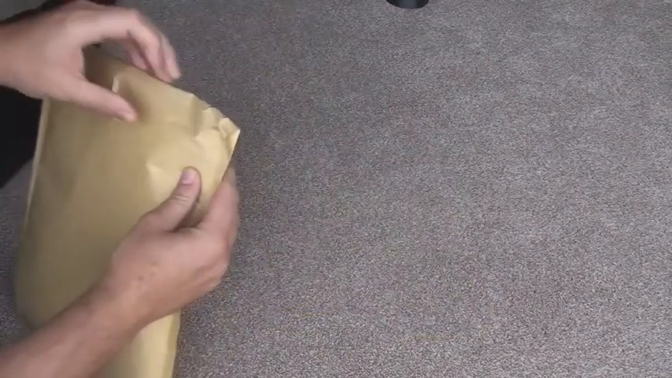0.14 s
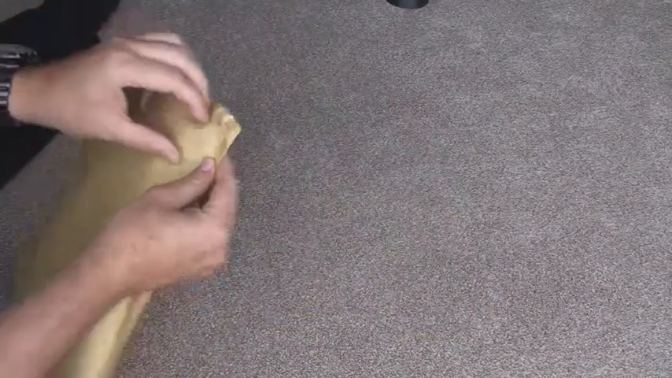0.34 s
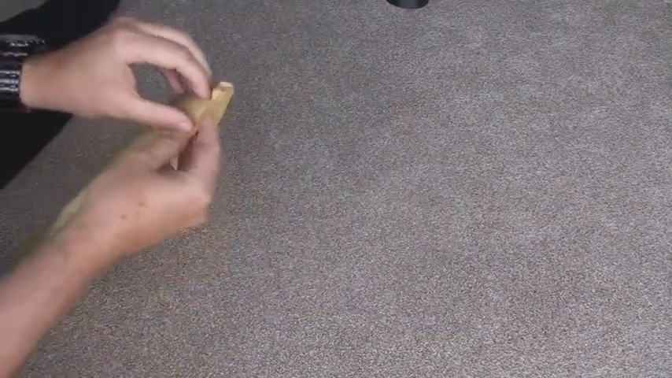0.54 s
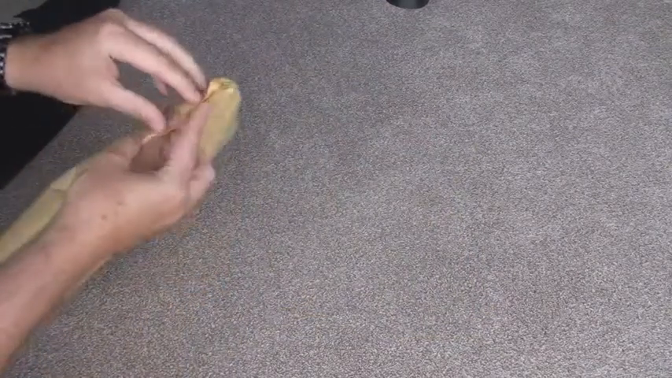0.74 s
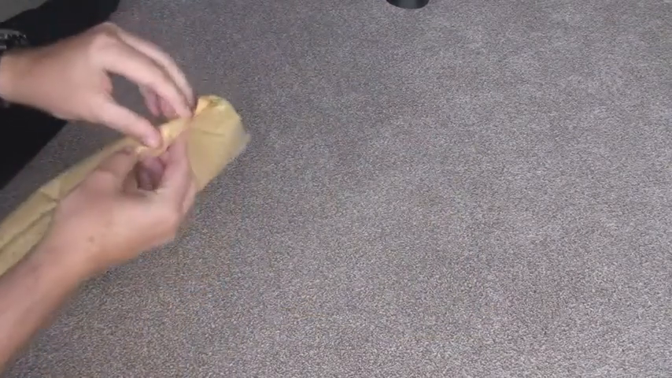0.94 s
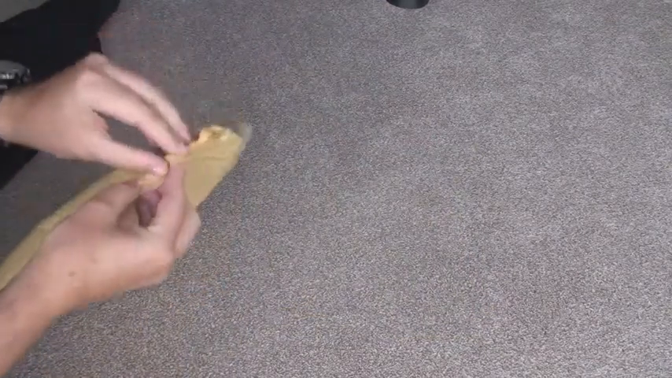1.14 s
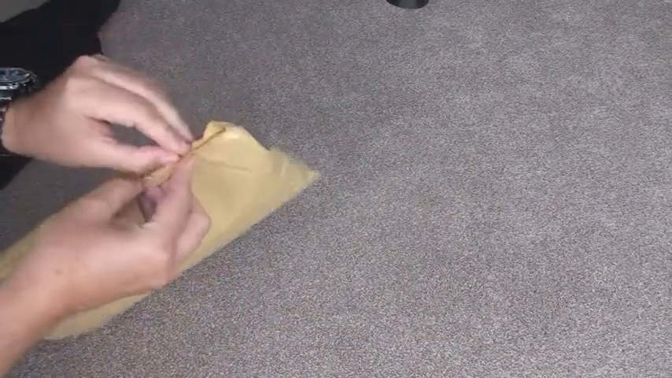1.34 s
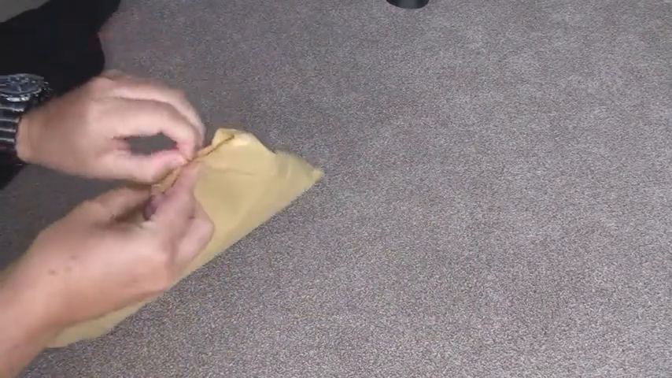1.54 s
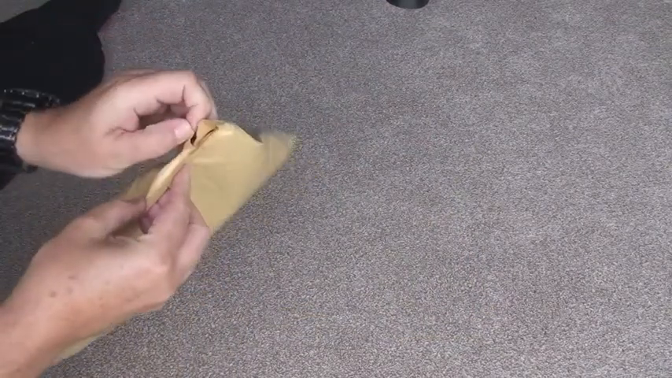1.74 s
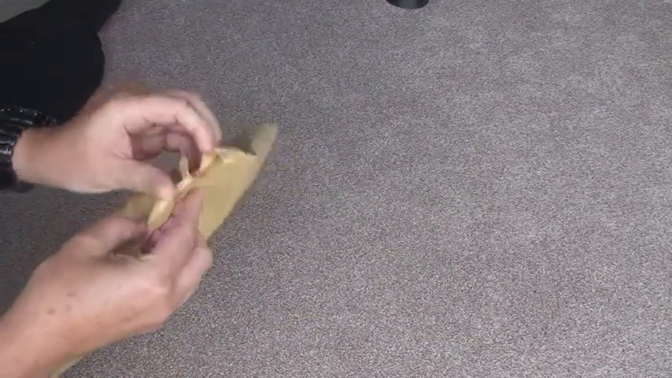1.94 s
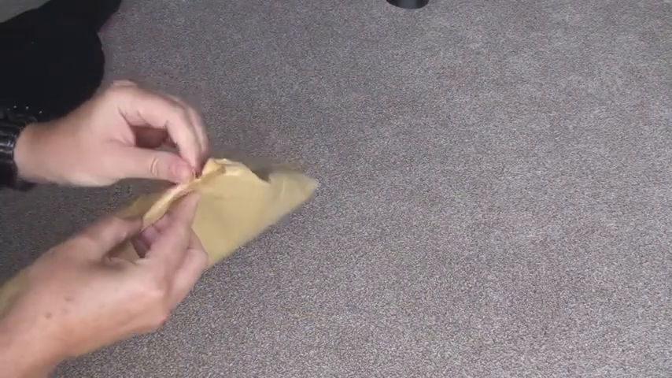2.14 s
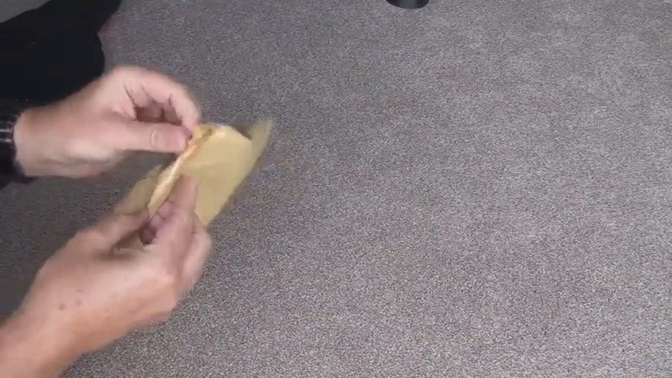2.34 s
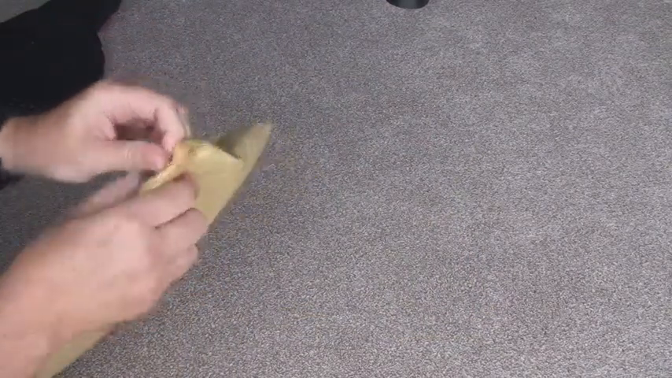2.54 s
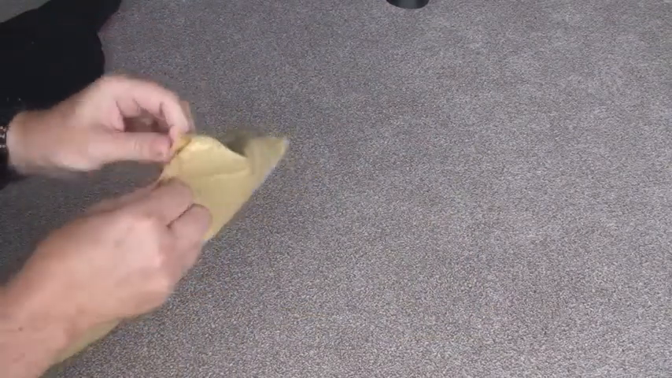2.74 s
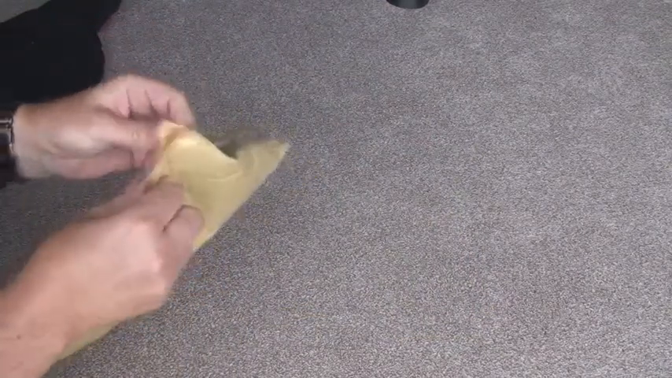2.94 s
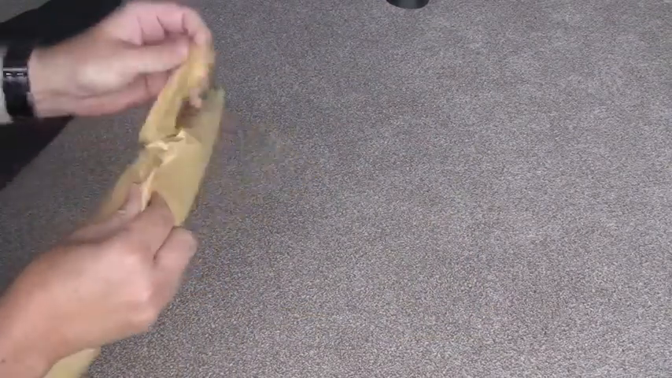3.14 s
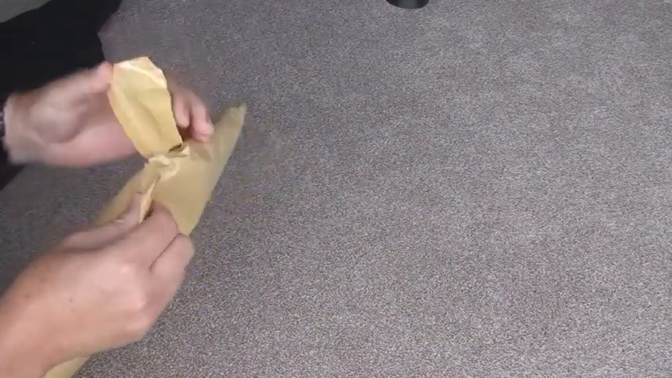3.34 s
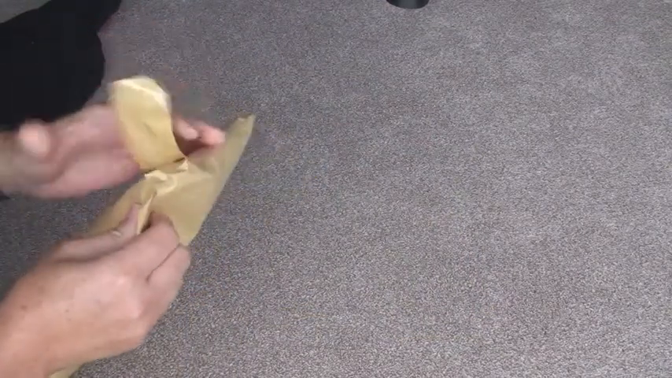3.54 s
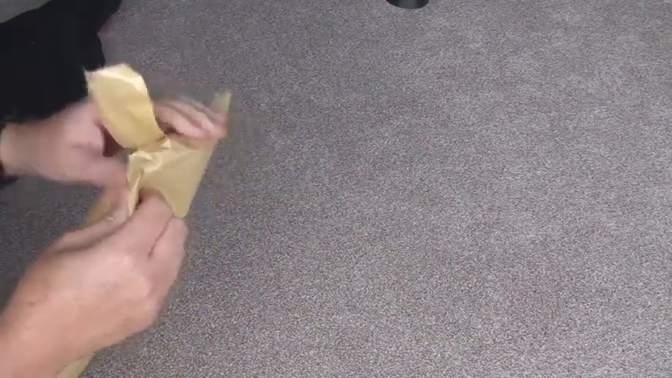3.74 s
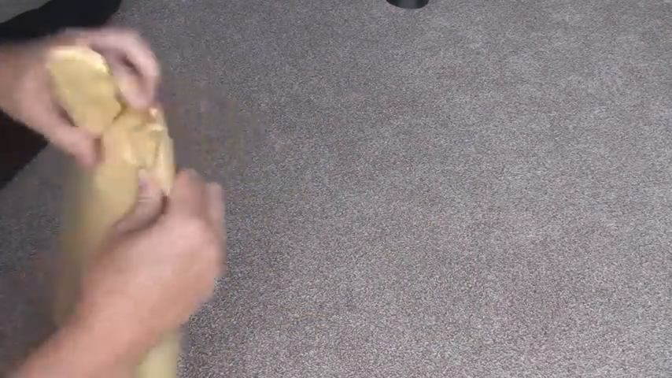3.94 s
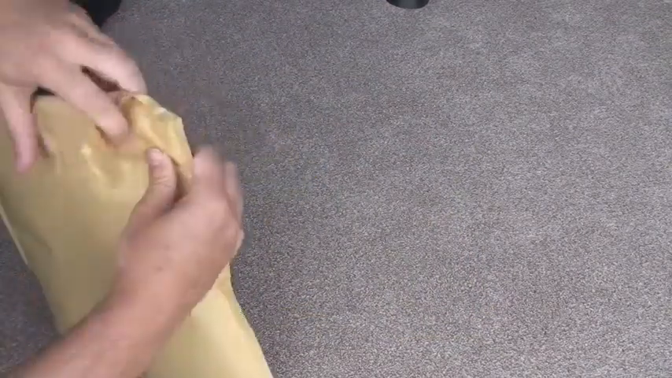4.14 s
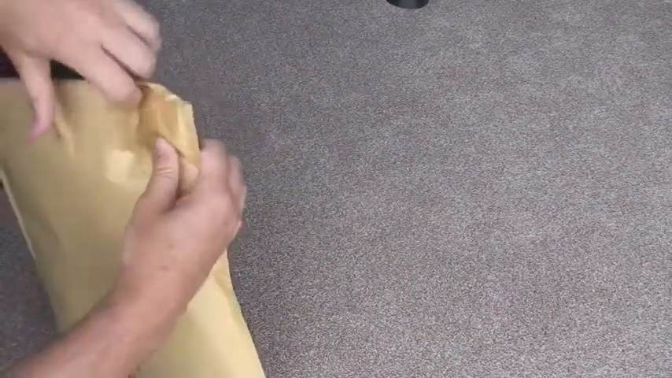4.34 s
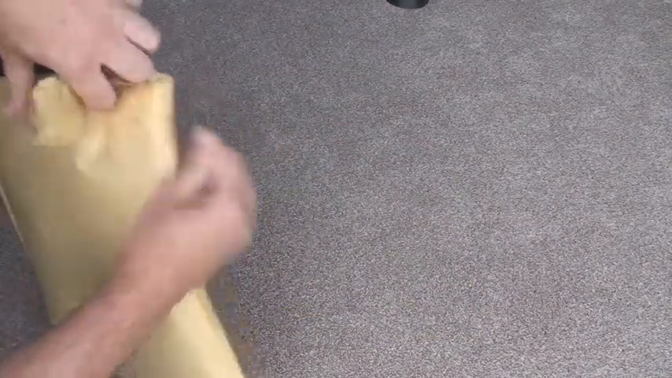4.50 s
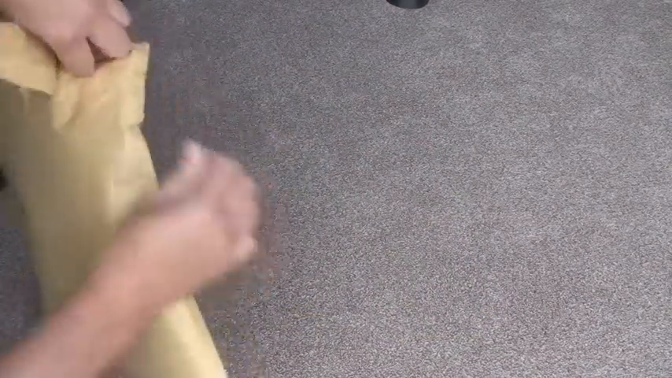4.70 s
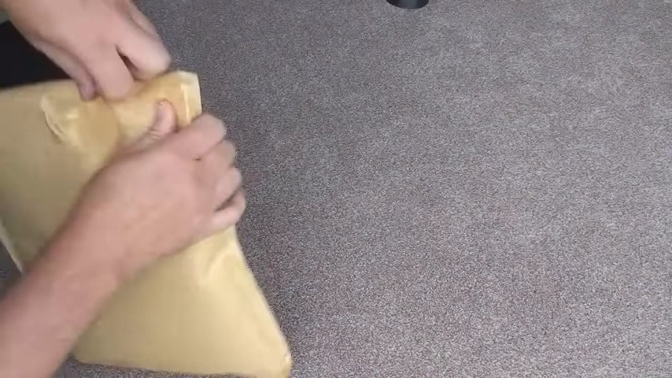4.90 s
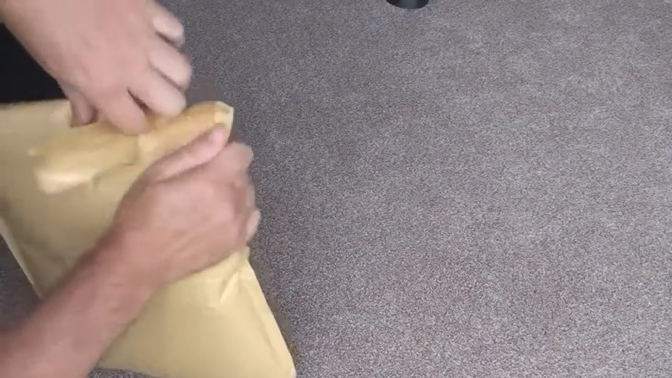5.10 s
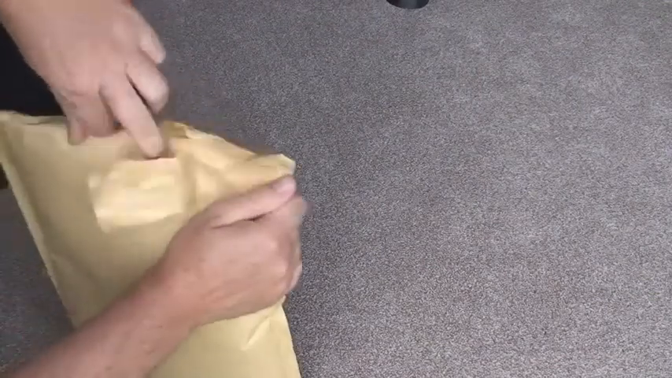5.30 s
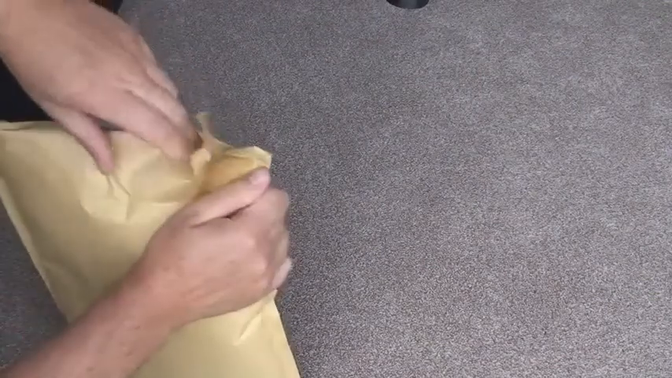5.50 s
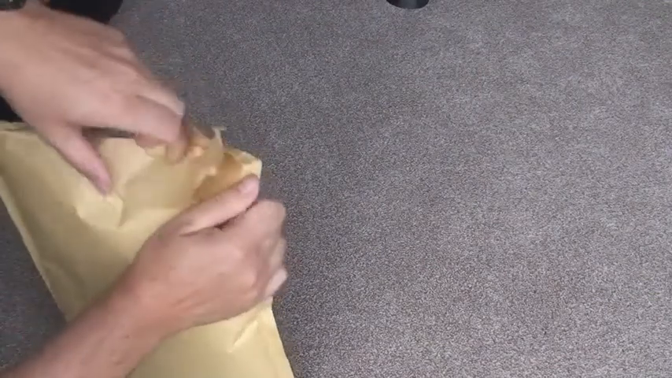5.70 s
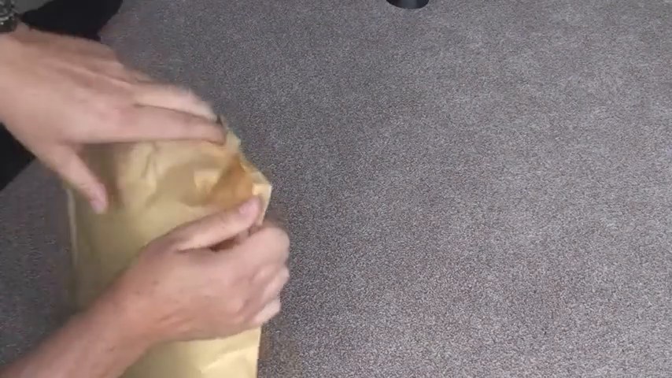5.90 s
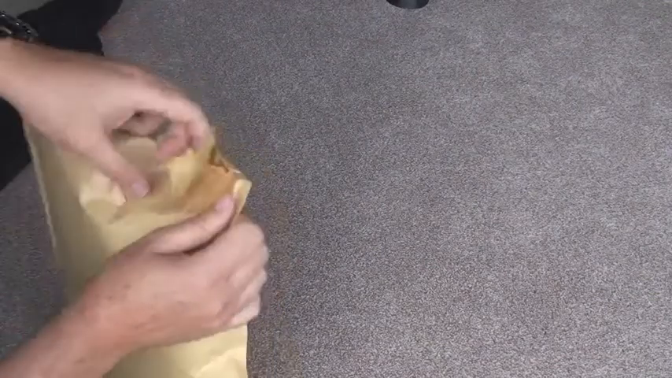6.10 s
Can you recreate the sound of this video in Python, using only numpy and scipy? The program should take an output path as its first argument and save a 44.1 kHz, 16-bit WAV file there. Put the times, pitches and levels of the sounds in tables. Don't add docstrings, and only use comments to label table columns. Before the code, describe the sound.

Close, dry crackling of a stiff paper mailer being squeezed, picked at and ripped in bursts, over a very faint low room hum.

```python
import sys
import numpy as np
from scipy import signal
from scipy.fft import rfft, irfft, next_fast_len
from scipy.io import wavfile
from scipy.ndimage import uniform_filter1d

SR = 44100
rng = np.random.default_rng(int(sys.argv[2]) if len(sys.argv) > 2 else 0)


def to_linear_factor(level_db):
    exponent = np.asarray(level_db, float) / 20
    return 10 ** exponent


def materialize(psi):
    bounded = np.clip(np.atleast_2d(psi).T, -1, 1)
    quanta = np.round(bounded * 32767).astype(np.int16)
    wavfile.write(sys.argv[1], SR, quanta)


N = 276227


def unit(x):
    return x / np.sqrt(np.mean(x ** 2, axis=-1, keepdims=True) + 1e-20)


def along(points, hz):
    f, v = np.transpose(points)
    return np.interp(np.log(hz + 1), np.log(f + 1), v)


def filtered(x, response):
    m = next_fast_len(x.shape[-1] + 8192)
    spectrum = rfft(x, m) * response(np.fft.rfftfreq(m, 1 / SR))
    return irfft(spectrum, m)[..., :x.shape[-1]]


def resonances(modes):
    def response(f):
        return sum((-1) ** k * to_linear_factor(db) * 1j * f * w / (c * c - f * f + 1j * f * w)
                   for k, (c, w, db) in enumerate(modes))
    return response


def level_of(rows):
    s, *columns = np.transpose(rows)
    t = np.arange(N) / SR
    return to_linear_factor([np.interp(t, s, db, -120, -120) for db in columns])


def place(times_s, rows):
    starts = np.round(np.asarray(times_s) * SR).astype(int)
    at = starts[:, None] + np.arange(rows.shape[1])
    return np.bincount(at.ravel(), rows.ravel(), N + SR)[:N]


def around(times_s, dbs, width_s):
    half = SR // 10
    t = np.arange(-half, half) / SR
    swells = to_linear_factor(dbs)[:, None] * np.exp(-(t / width_s) ** 2)
    return np.pad(place(times_s, swells)[half:], (0, half))


def ticks(count, spread_db, life_s):
    when, size = rng.random((count, 2)).T
    t = np.arange(int(min(life_s, .05) * SR)) / SR
    energy = to_linear_factor(-spread_db * np.log(size + .04))[:, None] ** 2
    return place(when * N / SR, energy * to_linear_factor(-120 * t / life_s))


def patches(x, wide, long):
    z = signal.stft(x, nperseg=256)[2]
    field = rng.standard_normal((2,) + z.shape)
    a, b = unit(uniform_filter1d(uniform_filter1d(field, wide, 1), long, 2))
    return z, a, b


# hz, level_db (per Hz)
HUM_SPECTRUM = [(25, -3), (50, -23), (64, 11.5), (88, 1), (110, -2), (1000, -16), (3000, -20),
                (16500, -6.5)]


def hum():
    noise = rng.standard_normal(N)
    return to_linear_factor(-53.0) * unit(filtered(noise, lambda hz: to_linear_factor(along(HUM_SPECTRUM, hz))))


# hz, t60_s
ROOM_DECAY = [(200, 0.29), (1500, 0.18), (5000, 0.17), (14000, 0.14)]


def room(x):
    hz, t, z = signal.stft(rng.standard_normal((8, SR // 2)), SR, nperseg=256)
    decay = to_linear_factor(-60 * t / along(ROOM_DECAY, hz)[:, None])
    tails = signal.istft(z * decay, SR, nperseg=256)[1]
    turn = np.arange(N) // 2048 % len(tails) == np.arange(len(tails))[:, None]
    delayed = np.pad(x * turn, ((0, 0), (200, 0)))
    answers = signal.fftconvolve(delayed, tails / np.linalg.norm(tails[0]), axes=1)
    return to_linear_factor(-6.5) * answers.sum(axis=0)[:N]


# time_s, level_db
LINK_MOTION = [(0, -34.5), (.13, -36), (.2, -59), (.9, -44.5), (.94, -37), (1.02, -58), (2.4, -64),
               (2.55, -44), (2.8, -46.5), (2.9, -69), (4.05, -53), (4.2, -36), (4.27, -48.5), (4.6, -37.5),
               (6.26, -72)]
# hz, width_hz, level_db
LINK_RESONANCES = [(5870, 130, 0), (7050, 200, -1.5), (8900, 200, -8)]


def links():
    touches = ticks(count=300, spread_db=3, life_s=.04)
    rub = np.sqrt(1.9 + touches / touches.mean()) * rng.standard_normal(N)
    return level_of(LINK_MOTION)[0] * unit(filtered(rub, resonances(LINK_RESONANCES)))


# start_s, peak_db, pitch_hz
LINK_STRIKES = [
    (0.437, -30.5, 6670),
    (2.462, -35, 6900),
    (2.528, -28, 5820),
    (2.587, -30.5, 6690),
    (2.618, -29, 6840),
    (2.655, -24, 5890),
    (2.698, -24.5, 5840),
    (2.697, -28, 6900),
    (2.768, -31, 6950),
    (3.159, -29.5, 6600),
]


def clinks():
    s, db, hz = np.transpose(LINK_STRIKES)[..., None]
    t = np.arange(SR // 8) / SR
    t60_s, beat_hz = 0.063, 130
    pair = np.sin(2 * np.pi * hz * t) + 0.64 * np.sin(2 * np.pi * (hz + beat_hz) * t)
    return place(s[:, 0], to_linear_factor(db - 3 - 60 * t / t60_s) * pair)


# time_s, effort_db, slide_db (slide against squeeze)
EFFORT = [(0.0, -23, -1), (0.42, -39, 0.5), (0.84, -31.5, -4), (0.96, -36.5, -3.5), (1.59, -40, -7.5),
          (1.74, -51, -9), (1.97, -51.5, 1), (2.14, -39, -0.5), (2.47, -35.5, -2.5), (3.42, -32, -7.5),
          (3.57, -47.5, -6), (3.82, -44, 5.5), (3.97, -34, -0.5), (4.64, -28, -1), (4.95, -24.5, 0.5),
          (5.09, -19.5, 0), (5.67, -34, -2.5), (6.26, -33.5, -1)]
# centre_s, length_s, change_db
GRIP_CHANGES = [(0.089, 0.064, 9), (0.144, 0.15, -5), (0.496, 0.049, -3.5), (1.518, 0.038, -17),
                (1.844, 0.044, -6), (2.008, .04, 6.5), (2.328, 0.25, -6), (2.653, 0.1, 17),
                (2.788, 0.3, -6.5), (2.958, 0.042, -23), (3.274, 0.1, -12.5), (3.691, 0.037, -12),
                (4.078, 0.046, -10), (4.271, 0.063, -8.5), (4.715, 0.086, 5), (4.818, 0.17, -9),
                (5.363, 0.086, -4), (5.521, 0.025, -8), (5.609, 0.034, 11), (5.71, 0.065, -5),
                (5.767, 0.048, 4.5), (5.814, 0.066, -6), (6.043, 0.055, -11), (6.195, 0.026, 10),
                (0.792, 0.039, -8), (1.1, .025, -7), (6.124, 0.028, 15), (1.587, 0.091, -7.5),
                (3.822, 0.022, -11), (3.895, .04, -7), (4.45, 0.051, -5.5), (5.097, 0.024, -9),
                (5.185, 0.025, -8), (5.222, 0.015, -16), (5.286, 0.019, -12), (5.313, 0.023, -12)]
# start_s, length_s, level_db
BAG_JOLTS = [
    (0.003, 0.083, -49),
    (3.003, 0.12, -46),
    (3.535, 0.028, -37),
    (4.562, 0.035, -38),
    (4.704, 0.042, -41),
    (4.926, 0.19, -49),
    (5.394, 0.076, -45),
    (5.618, 0.031, -54),
    (5.904, 0.054, -47),
    (6.064, 0.16, -47),
]
PULL_SHAKES_DB = (1, -42, -33)


def handling():
    middle_db = -42
    part_db = (-61, -49, -47.5, -48.5)
    part_grows = (0.52, 0.59, 0.86, 0.73)
    part_slides = (-0.18, -0.65, 0.18, 0.91)
    s, effort_db, slide_db = np.transpose(EFFORT)
    t = np.arange(N) / SR
    grip_db = sum(db * np.exp(-(2 * (t - at) / length) ** 2) for at, length, db in GRIP_CHANGES)
    pull_shake = sum(to_linear_factor(db) * level_of(rip)[0] for db, rip in zip(PULL_SHAKES_DB, RIP_LEVELS))
    crease_s, crease_db = np.transpose(creases())[:2]
    strain = around(crease_s, crease_db - 37.5, width_s=0.02)
    hands = to_linear_factor(np.interp(t, s, effort_db) + grip_db)
    effort = 20 * np.log10(hands + (pull_shake + strain)) - middle_db
    slide = np.interp(t, s, slide_db)
    gain = to_linear_factor([db + grows * effort + lean * slide
                for db, grows, lean in zip(part_db, part_grows, part_slides)])
    jolt = sum(to_linear_factor(db) * np.exp(-(1.3 * (2 * (t - at) / length - 1)) ** 2 / 2)
               for at, length, db in BAG_JOLTS)
    return gain + np.outer([1, 0, 0, 0], jolt)


# hz, level_db (per Hz)
PAPER_SPECTRUM = [(24, -53), (40, -20.5), (252, -4), (284, -8), (313, -6), (865, -4.5), (1050, -1),
                  (1240, -3.5), (1660, 2), (1920, 0), (2330, 3.5), (6930, -5), (16600, -15), (17500, -72)]
PART_EDGES_HZ = (200, 1200, 5000)


def paper_parts(x):
    def response(hz):
        below = [0 * hz] + [1 / (1 + (hz / edge) ** 6) for edge in PART_EDGES_HZ] + [0 * hz + 1]
        bands = np.sqrt(np.abs(np.diff(below, axis=0)))
        return to_linear_factor(along(PAPER_SPECTRUM, hz)) * bands
    return unit(filtered(x[..., None, :], response))


def crackle(gain):
    whole = ticks(count=450, spread_db=3.2, life_s=.016)
    own = np.array([ticks(count=500, spread_db=3.0, life_s=life) for life in (0.098, 0.13, 0.024, 0.004)])
    steady = np.array([[1.5], [.5], [.4], [.55]])
    shared = np.array([[.05], [.35], [.25], [.1]])
    energy = steady + shared * whole / whole.mean() + 0.2 * own / own.mean(axis=1, keepdims=True)
    z, spots, _ = patches(rng.standard_normal(N), wide=12, long=5)
    grainy = signal.istft(z * to_linear_factor(2.0 * spots), nperseg=256)[1][:N]
    rustle = unit(np.sqrt(np.abs(energy)) * paper_parts(grainy))
    return np.sum(gain * rustle, axis=0)


def crinkles(gain):
    when, size, life = rng.random((1100, 3)).T
    hz = np.clip(1700 * np.exp(0.617 * rng.standard_normal(len(when))), 600, 12000)[:, None]
    t = np.arange(700) / SR
    cycles = 3 + 8 * life[:, None]
    tone = np.sin(2 * np.pi * hz * t) * to_linear_factor(-60 * t * hz / cycles) * (1 - np.exp(-3 * t * hz))
    flips = place(when * N / SR, to_linear_factor(-6 * np.log(size + .09))[:, None] * tone)
    return to_linear_factor(-7.0) * gain * unit(flips)


# start_s, peak_db
FIBRE_BREAKS = [(.185, -20), (0.343, -12), (.862, -17), (1.1203, -9), (1.128, -22), (1.3595, -26),
                (1.466, -30), (1.5846, -23), (1.7041, -23), (2.0048, -21), (2.6428, -8), (3.0453, -13),
                (3.4338, -6), (3.4696, -18), (3.4783, -19), (3.839, -1), (3.8487, -4), (3.852, -16),
                (3.962, -15), (4.129, -15), (4.454, -24), (4.5226, 1), (5.1934, -16), (5.298, -5),
                (5.4058, -11), (5.537, -14), (5.6217, -3), (5.8603, -1.5)]
THUMB_SLIPS = [2.2395, 2.2555, 2.268, 2.2768, 2.2858, 2.2924, 2.3035, 2.3127, 2.3232, 2.3545, 5.727, 5.7352]


def slips():
    t = np.arange(400) / SR

    def click(hz, t60_s):
        return np.sin(2 * np.pi * hz * t) * to_linear_factor(-60 * t / t60_s)

    fibre = click(5500, .0011)
    s, db = np.transpose(FIBRE_BREAKS)
    breaks = place(s, to_linear_factor(db - 1.5)[:, None] * fibre)
    tick = to_linear_factor(-23) * (click(950, .007) + .6 * click(1.9 * 950, .007 / 2) + 0.26 * fibre)
    return breaks + place(THUMB_SLIPS, np.tile(tick, (len(THUMB_SLIPS), 1)))


# start_s, peak_db, pitch_hz, life_cycles
FACET_POPS = [(.228, -14.5, 2500, 4.4), (.262, -26, 1070, 16), (.342, -15, 4470, 14),
              (.371, -22, 870, 8.3), (2.483, -21, 1060, 11), (2.61, -21, 1510, 8), (2.711, -20, 1710, 13),
              (.313, -22, 1330, 8), (0.55, -21, 3200, 18), (.607, -27, 970, 9.1), (.686, -13, 3880, 28),
              (.6925, -18, 3900, 12), (0.71, -19, 6000, 30), (.81, -9.5, 935, 8), (.83, -11.5, 1650, 17),
              (0.868, -15, 1230, 6.8), (0.901, -20, 1700, 10), (.936, -19.5, 6950, 49),
              (0.966, -26.5, 900, 16), (1.005, -24, 1110, 8), (1.113, -16, 1510, 6),
              (1.431, -31, 637, 8.9), (1.458, -22, 645, 7), (1.483, -19, 800, 3), (1.546, -26, 600, 7.9),
              (1.564, -24, 734, 10), (1.585, -28, 575, 7), (1.633, -20, 614, 4.6), (1.662, -23, 710, 9.2),
              (1.691, -14.5, 780, 6), (1.712, -19, 750, 7), (4.382, -29, 553, 7.8),
              (4.426, -10, 2500, 10), (4.426, -18.5, 1070, 15), (4.474, -19, 795, 6.5),
              (4.557, -13, 1104, 21), (4.599, -19, 4500, 10), (4.65, -32, 484, 16),
              (2.971, -18, 790, 8.4), (2.999, -9.5, 1510, 8), (3.02, -8.5, 900, 8.5),
               (3.026, -10, 3500, 6.4), (3.034, -9, 4070, 17), (3.0455, -3, 3800, 6.5),
               (3.052, -11, 1600, 13), (3.071, -10.5, 4220, 20), (3.087, -9, 2000, 14),
               (3.1183, -8.5, 1700, 14.5), (3.655, -15, 474, 3), (3.8348, -10, 3540, 7.9),
               (3.879, -15, 1350, 14), (3.918, -30, 1480, 8), (3.927, -20, 1010, 27),
               (3.944, -19, 1290, 13), (3.9512, -10, 1580, 17), (3.961, -3.5, 2480, 6.4),
               (3.9623, -19, 1480, 5.4), (3.977, -18, 1510, 7.6), (4.017, -15, 2520, 6),
               (4.931, -12.5, 1160, 12), (4.936, -17, 2200, 5.5), (4.957, -13, 1030, 11),
               (4.98, -18, 3500, 5), (5.001, -16, 1070, 10), (5.047, -12, 940, 8.5),
               (5.074, -5.5, 1200, 4.2), (5.08, -14, 4500, 6), (5.134, -6, 1500, 4.6),
               (5.138, -10, 5800, 14), (5.158, -9.5, 3900, 24), (5.195, -16, 3000, 4),
               (5.209, -21, 3340, 15), (5.212, -5, 6000, 25), (5.276, -6, 8600, 19),
               (5.296, -1.5, 8400, 21), (5.33, -23, 1250, 12), (5.416, -15, 4340, 17),
               (5.42, -13.5, 700, 6.7)]


def pops():
    s, db, hz, cycles = np.transpose(FACET_POPS)[..., None]
    t = np.arange(SR // 20) / SR
    note = np.sin(2 * np.pi * hz * t) * (1 - np.exp(-2.5 * t * hz))
    return place(s[:, 0], to_linear_factor(db + 3.0 - 60 * t * hz / cycles) * note)


# start_s, peak_db, pitch_hz
WALL_BUCKLES = [
    (3.653, -25.5, 375),
    (4.552, -8.5, 637),
    (4.995, -18.5, 368),
    (5.759, -16, 1050),
    (6.123, -11.5, 980),
]


def buckles():
    s, db, hz = np.transpose(WALL_BUCKLES)[..., None]
    t = np.arange(SR // 10) / SR
    ring = np.sin(2 * np.pi * hz * t) + 0.24 * np.sin(2 * np.pi * 2.0 * hz * t)
    return place(s[:, 0] + 0.00237, to_linear_factor(db + 1.0 - 60 * t * hz / 11) * ring)


# time_s, level_db
RIP_LEVELS = [
    [(2.95, -40.5), (3.025, -15), (3.06, -15), (3.16, -39.5)],
    [(3.31, -59), (3.34, -36), (3.43, -31), (3.485, -36.5), (3.53, -61)],
    [(3.82, -36), (3.836, -28), (4.03, -34.5)],
]
# hz, width_hz, level_db
STRIP_RESONANCES = [
    [(1600, 1200, 0), (4070, 3800, 2.5), (8500, 5200, 0.5), (12300, 1700, -0.5), (15500, 840, -4)],
    [(1600, 140, 3), (2280, 130, 12), (7440, 5700, -1.5)],
    [(1380, 750, -16), (3000, 2600, -39)],
]
# start_s, strength_db
PULL_JERKS = [(3.319, -4), (3.338, 0), (3.347, 9), (3.354, 1), (3.377, 7), (3.395, 9), (3.411, 4),
              (3.421, 3), (3.434, -2), (3.46, 0.5), (3.467, 7), (3.479, 1), (3.502, 0), (3.51, 7)]


def rips():
    breaks = ticks(count=4000, spread_db=3, life_s=.003)
    tugs = ticks(count=700, spread_db=2, life_s=.014)
    stream = np.sqrt(0.7 + breaks / breaks.mean()) * rng.standard_normal(N)
    s, db = np.transpose(PULL_JERKS)
    t, jerk_t60_s = np.arange(SR // 20) / SR, 0.019
    slow = place(s, to_linear_factor(db[:, None] + 10 - 60 * t / jerk_t60_s)) ** 2
    unrest = (6 + tugs / tugs.mean(), 0.42 + slow, 1.0 + tugs / tugs.mean())
    pulls = [unit(filtered(stream * np.sqrt(energy), resonances(modes)))
             for energy, modes in zip(unrest, STRIP_RESONANCES)]
    return sum(to_linear_factor(-2.5) * level_of(rip)[0] * pull for rip, pull in zip(RIP_LEVELS, pulls))


# start_s, peak_db, brightness_db, panel_hz
PANEL_PINGS = [(0.1726, -23, 13, 4140), (0.6843, -7.5, 0, 2970), (0.8325, -8.5, -13, 1600),
               (0.891, -13, 7, 2150), (1.1433, -17, -3, 1030), (1.3271, -23, -6, 1680),
               (1.599, -16.5, -5, 2080), (1.7469, -14.5, 6, 1460), (1.7835, -23.5, 2, 2900),
               (1.9567, -19.5, 4, 1990), (2.055, -20, 10, 2950), (2.0663, -18, 16.5, 4370),
               (2.589, -14, 5, 1570), (2.826, -23, 2, 2090), (3.3396, -13.5, -8, 2280),
               (3.3783, -8.5, -6, 1580), (3.502, -14.5, 14, 2230), (4.234, -38, -3, 1300),
               (4.5117, -7, 3, 2600), (4.5227, -10, 12, 2700), (4.555, -6, -15.5, 2080),
               (4.61, -20, 14, 3000), (2.698, -14.5, 6, 2220), (3.554, -16.5, -10, 1980),
               (4.5856, -12.5, 9, 4400), (4.913, -10.5, -13.5, 2800), (5.182, -11, 7, 3440),
               (5.818, -18.5, 11, 3350), (5.861, -16.5, -6, 1380), (5.884, -3.5, 7, 2180)]
# start_s, peak_db, brightness_db, panel_hz
CREASE_CRACKS = [(0.3315, -5, 4.5, 4930), (0.6236, -13.5, 1, 2080), (0.7025, -13.5, -2, 1090),
                 (0.789, -18.5, -8, 1580), (1.235, -31, 16.5, 2500), (1.275, -27.5, -13, 1710),
                 (1.5369, -24, -2, 1010), (1.667, -13.5, -3, 2170), (1.911, -15, -4, 2770),
                 (2.1067, -16, 14.5, 2920), (2.1602, -16.5, -12, 940), (2.1798, -13, -12, 1460),
                 (2.3781, -19.5, 10.5, 1700), (2.4322, -25.5, -15.5, 1570), (3.119, -15, -8, 1670),
                 (3.5105, -13.5, -9.5, 2280), (3.8401, -8.5, 3, 6000), (4.3304, -23, -9, 1100),
                 (3.8639, -7.5, 6.5, 1620), (4.319, -20, -11.5, 2150), (4.4904, -12.5, 5.5, 2790),
                 (4.9336, -8, -8, 1070), (4.9548, -22.5, -18, 1050), (5.2471, -8, -10.5, 1120),
                 (6.07, -21, -11, 1050), (6.0866, -17, -6, 1050), (6.1266, -4.5, 3, 1600),
                 (3.287, -30.5, 9, 4540), (4.714, -27, -14, 1510), (2.531, -22, 9.5, 3000)]
# start_s, peak_db, brightness_db, panel_hz
FOLD_CRUNCHES = [(0.361, -22, -2.5, 1130), (0.7175, -23, -9, 1570), (0.8102, -41, -16, 1080),
                 (1.4056, -33.5, -12, 1680), (1.48, -40, -2, 1380), (1.5654, -34.5, 2, 990),
                 (1.71, -20, 3.5, 2280), (2.032, -30, -1, 1000), (2.0741, -18, 4.5, 3150),
                 (2.2229, -21.5, -2.5, 990), (2.3363, -39.5, -18.5, 1620), (2.873, -17, 1.5, 920),
                 (3.544, -14, -1.5, 1600), (3.73, -30.5, -0.5, 970), (3.781, -37, -14, 990),
                 (3.8784, -36.5, -15.5, 1430), (3.9775, -23.5, 7.5, 1510), (4.0954, -15.5, -1.5, 2700),
                 (4.158, -30.5, 11.5, 3690), (4.4258, -23.5, 4.5, 1070), (5.064, -14, -1, 2060),
                 (5.1267, -9.5, -0.5, 1420), (5.2764, -37.5, 24, 1800), (5.297, -12, 1, 4350),
                 (5.4057, -11, 2, 4400), (5.436, -13.5, 5, 2500), (5.6215, -13.5, 3, 2850),
                 (5.92, -19.5, -6.5, 1010), (2.8, -38, 10.5, 1480), (5.973, -36, 10, 2490)]
# start_s, peak_db, brightness_db, panel_hz, t60_ms
SLOW_SQUEEZES = [(.366, -20.5, 1, 1720, 360), (0.5261, -25.5, -2, 1550, 240),
                 (0.863, -17.5, -1.5, 3030, 120), (1.1131, -19, -2, 1190, 43),
                 (1.691, -27.5, 12, 2000, 180), (2.4984, -24, -6, 970, 70), (2.6249, -18, -5.5, 1410, 67),
                 (2.643, -16.5, 0.5, 1880, 170), (2.8868, -19.5, -2, 3970, 120),
                 (2.971, -23.5, -4, 1740, 320), (3.0242, -18.5, -11.5, 2440, 1400),
                 (3.3198, -23, 1, 1640, 25), (3.3482, -26, 14, 2280, 120), (3.3957, -24.5, -2, 2340, 170),
                 (3.4204, -14.5, 10.5, 4200, 53), (3.953, -17, -4, 1460, 160), (4.8372, -30, 7, 2660, 220),
                 (4.9971, -27.5, -12, 1420, 710), (5.1556, -17.5, -6.5, 1080, 61),
                 (5.2054, -3, 3, 2830, 43), (5.5346, -22, 4.5, 2540, 94), (5.736, -35.5, 14.5, 1390, 330),
                 (5.8523, -27.5, -15.5, 1010, 2200), (6.148, -15, 2.5, 1030, 65)]


def creases():
    short_kinds = zip((PANEL_PINGS, CREASE_CRACKS, FOLD_CRUNCHES), (20.6, 15.4, 19))
    kinds = [[row + (ms,) for row in rows] for rows, ms in short_kinds] + [SLOW_SQUEEZES]
    flanks_db = (-18.5, -10, 1.5, -6)
    return [(s, db, db + flank - bright, db + flank + bright, hz, ms)
            for rows, flank in zip(kinds, flanks_db) for s, db, bright, hz, ms in rows]


def snaps():
    s, mid_db, low_db, high_db, hz, t60_ms = np.transpose(creases())
    t = np.arange(2048) / SR
    jumps = to_linear_factor(3.43 * rng.standard_normal((len(s), len(t) // 16))).repeat(16, axis=1)
    burst = rng.standard_normal((len(s), len(t))) * jumps
    pitch = hz[:, None]

    def panel(f):
        return 1j * f * .15 * pitch / (pitch ** 2 - f * f + 1j * f * 0.038 * pitch)

    parts = paper_parts(burst)[:, 1:]
    parts[:, 1] = 1.58 * parts[:, 1] + 2.0 * unit(filtered(burst, panel))
    life_s = t60_ms[:, None, None] / 1000 * np.array([[1.1], [.8], [.7]])
    cracks = parts * to_linear_factor(-60 * t / life_s) * (1 - np.exp(-t / 0.00031))
    strongest = np.sqrt(uniform_filter1d(cracks ** 2, size=60).max(axis=-1))
    gain = to_linear_factor(np.transpose([low_db - 6.5, mid_db - 9.5, high_db - 7.0])) / strongest
    return place(s - .0004, np.sum(gain[..., None] * cracks, axis=1))


# hz, left_minus_right_db
LEFT_LEAN = [(60, 0), (180, 0.5), (550, 2.5), (1650, 3), (4970, 0.5), (10000, 2.5), (12000, 0.8)]
# hz, side_db
CAPSULE_SIDE = [(60, -23), (500, -17), (3000, -17), (6000, -17.5), (9500, -11.5), (11100, -8), (11800, -20),
                (16000, -16)]


def scene():
    gain = handling()
    sources = snaps() + buckles() + pops() + slips() + clinks() + rips() + crinkles(gain[2])
    near = filtered(sources, lambda hz: 1 / (1 + (130 / (hz + 1)) ** 4))
    mid = near + room(near) + crackle(gain) + links() + hum()
    z, a, b = patches(mid, wide=4, long=6)
    wander = signal.istft(z * (1.0 * a + .7j * b), nperseg=256)[1][:N]
    side = filtered(wander, lambda hz: to_linear_factor(along(CAPSULE_SIDE, hz)))
    pair = filtered(mid, lambda hz: 2 / (1 + to_linear_factor([[-1], [1]] * along(LEFT_LEAN, hz))))
    return pair + [[1], [-1]] * side


def top_cut(x):
    return signal.sosfilt(signal.butter(12, 16670, fs=SR, output="sos"), x)


def record(dry):
    x = filtered(dry, lambda hz: 1 / (1 + (38 / (hz + 1)) ** 4) / (1 + (hz / 16000) ** 60))
    x = filtered(x, lambda hz: to_linear_factor(-15.5 / (1 + (14160 / (hz + 1)) ** 20)))
    x = x / (1 + np.abs(x / .92) ** 6) ** (1 / 6)
    return top_cut(x)


dry = scene()
out = record(dry)
materialize(out)
```